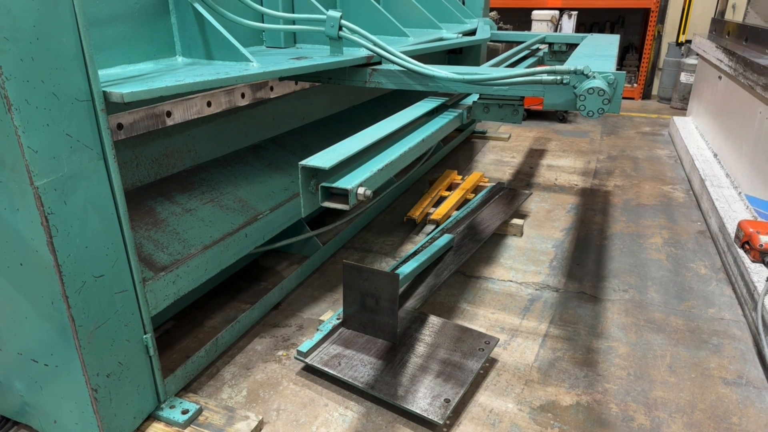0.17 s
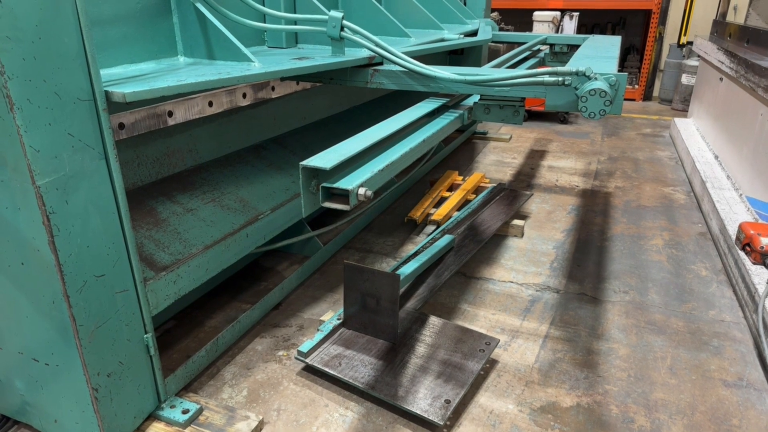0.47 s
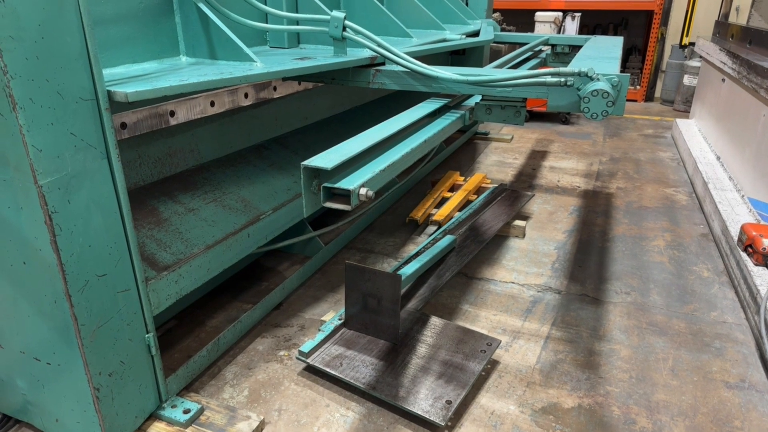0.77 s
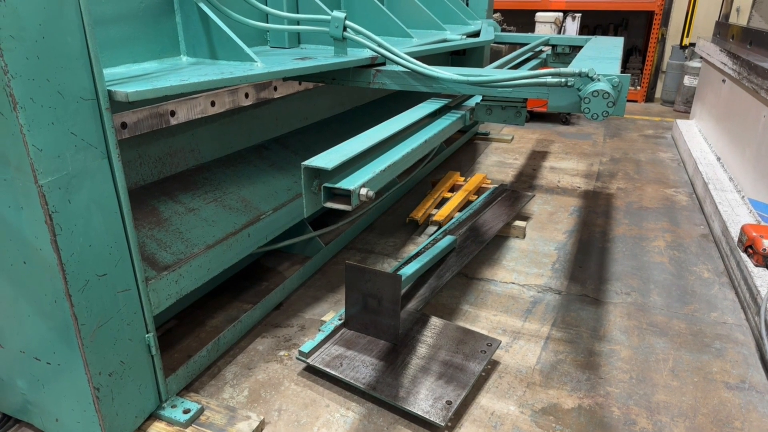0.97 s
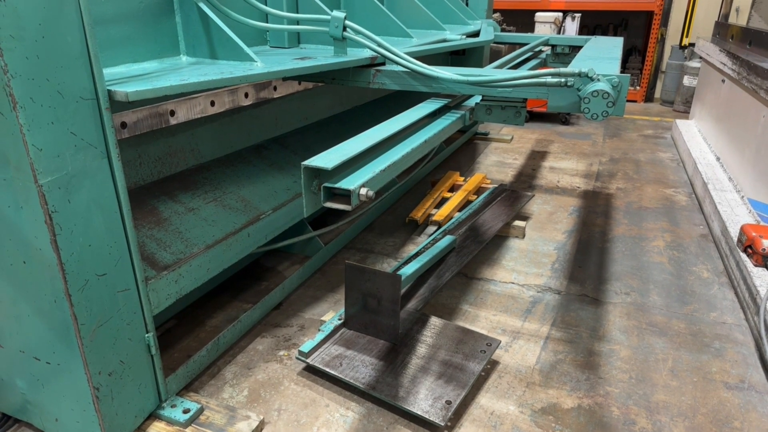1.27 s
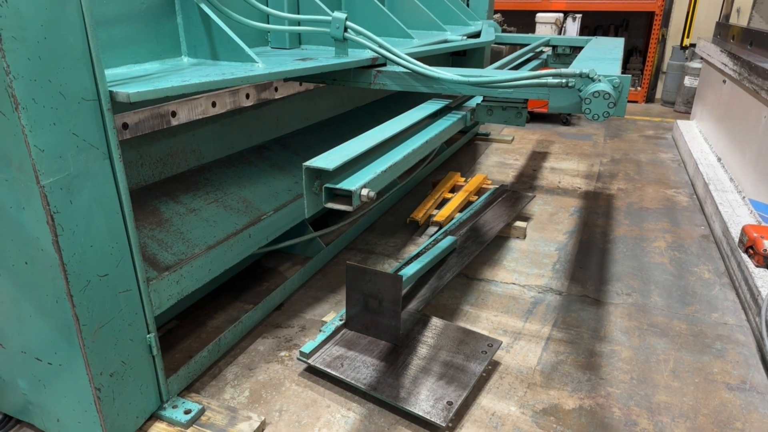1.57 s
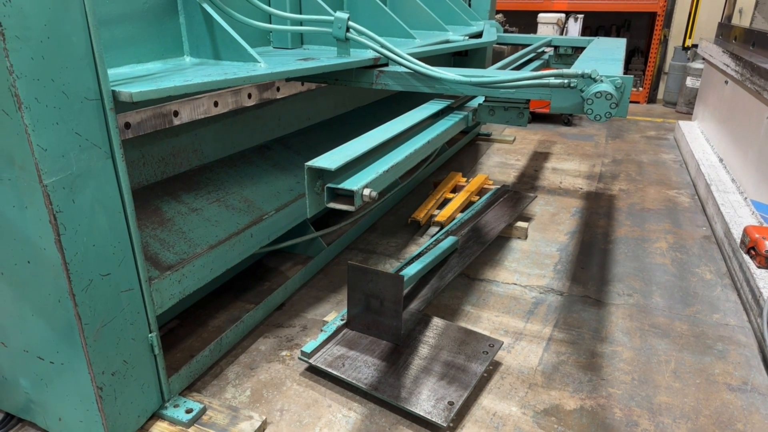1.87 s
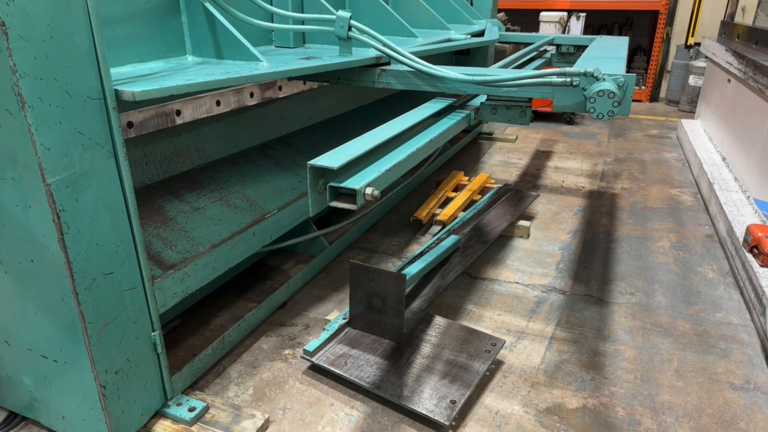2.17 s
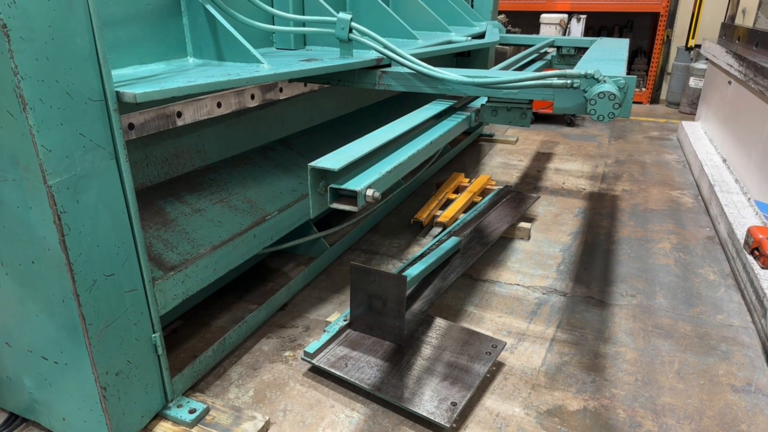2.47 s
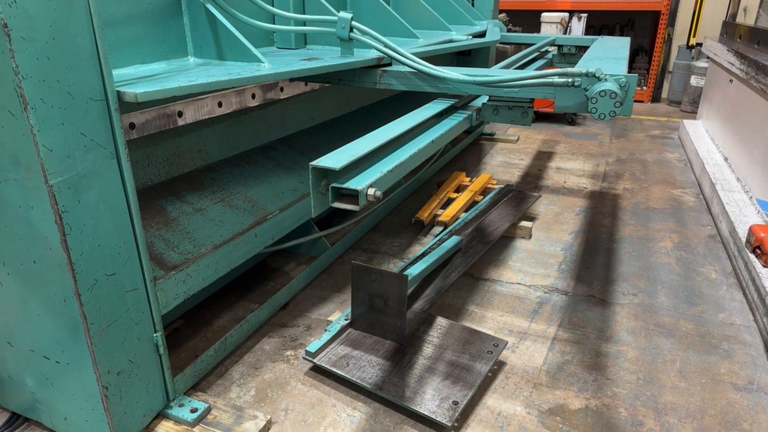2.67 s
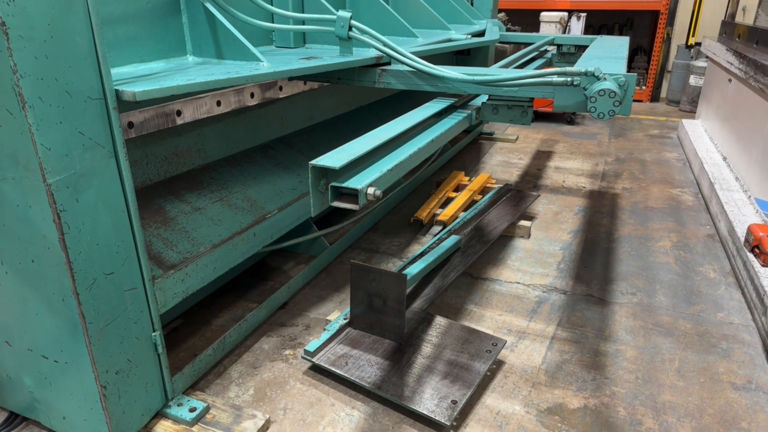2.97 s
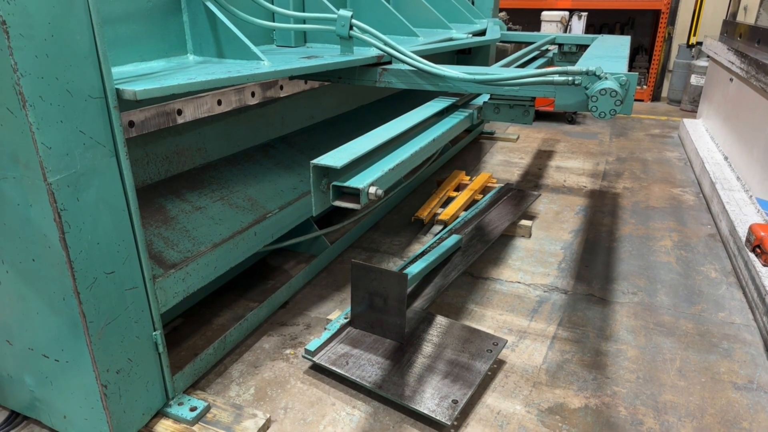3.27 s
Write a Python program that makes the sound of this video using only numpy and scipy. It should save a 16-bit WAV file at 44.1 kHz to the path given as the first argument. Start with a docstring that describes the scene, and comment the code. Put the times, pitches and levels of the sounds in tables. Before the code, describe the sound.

A large hydraulic metal shear hums, whines and hisses, with two hard clunks between strokes.

```python
"""Hydraulic metal shear

A large hydraulic shear works in a workshop, heard close by, the same in both channels.
Motor hum and pump whine are sums of wavering sines over a steady wash of filtered noise.
During each stroke oil rushes as broad noise and sings in narrow, fluttering noise bands.
A valve shuts with a clunk of decaying noise and frame tones; the pump idles slightly faster.
A second clunk starts the next stroke, in which a valve whistles briefly.
"""
import sys
import numpy as np
from scipy import signal
from scipy.fft import rfft, irfft, next_fast_len
from scipy.io import wavfile

SR = 44100
rng = np.random.default_rng(int(sys.argv[2]) if len(sys.argv) > 2 else 0)


def persist_wave(psi):
    """Save psi, clipped to +-1, as 16-bit WAV."""
    counts = np.round(np.clip(psi, -1, 1) * 32767).astype(np.int16)
    wavfile.write(sys.argv[1], SR, np.atleast_2d(counts).T)


N = 150822  # length in samples


def amp(db):
    """Decibels to gain."""
    return 10 ** (np.asarray(db) / 20)


def unit(x):
    """Scales to rms 1."""
    return x / np.sqrt(np.mean(x ** 2) + 1e-20)


def read(points, hz):
    """Reads a table on a log-frequency axis."""
    f, value = np.transpose(points)
    return np.interp(np.log(hz + 1), np.log(f + 1), value)


def add(mix, s, sound):
    """Adds a sound at its time."""
    part = mix[round(s * SR):][:len(sound)]
    part += sound[:len(part)]


def noise(shape, size=N):
    """Noise of rms 1 with the gain shape(Hz)."""
    n = next_fast_len(size)
    spectrum = rfft(rng.standard_normal(n)) * shape(np.fft.rfftfreq(n, 1 / SR))
    return unit(irfft(spectrum, n)[:size])


def drift(hz):
    """Slow random wavering of rms 1, up to about hz, drawn every 64 samples."""
    frames = N // 64 + 2
    f = np.fft.rfftfreq(frames, 64 / SR)
    lowpass = (f > 0) / (1 + (f / hz) ** 2)
    slow = unit(irfft(rfft(rng.standard_normal(frames)) * lowpass, frames))
    return np.interp(np.arange(N) / 64, np.arange(frames), slow)


def ramp(s, length):
    """Goes from 0 to 1, starting at s."""
    return np.clip((np.arange(N) / SR - s) / length, 0, 1)


# motor hum lines [f/Hz]
HUM_HZ = [60, 90.2, 120.05, 150.6, 180, 210.1, 240, 269.3, 299.5]
# strength of each hum line and how much it wavers [level/dB, waver/dB]
HUM_LEVELS = [(-61, 2), (-51, 1.6), (-30, 0.3), (-47, 0.67), (-57.5, 2.5), (-42.5, 1.3), (-54.5, 2.6),
              (-50.5, 4.1), (-51.5, 1.8)]
HUM_LOAD_DB = 1.3  # the hum is this much louder under load


def hum(load):
    """The motor's magnetic hum and the low throb of its casing: wavering sines."""
    t = np.arange(N) / SR
    lines = np.zeros(N)
    for hz, (db, waver) in zip(HUM_HZ, HUM_LEVELS):
        level = amp(db + waver * drift(hz=6.8))
        lines += level * np.sin(2 * np.pi * (hz * t + rng.random()))
    return lines * amp(HUM_LOAD_DB * (load - 1.0))


# pump harmonics 1, 2, 3 .. under load and idling [level/dB]
PUMP_LOADED = [-47, -37, -48.5, -42, -57, -51.5, -57, -51, -62, -62, -57, -53, -59, -59, -55, -61, -57]
PUMP_IDLE = [-50, -44, -39.5, -50, -50, -58, -50, -54.5, -64, -72, -57, -54, -61, -62, -74, -62, -63, -77,
             -59, -66, -69, -68, -64, -57.5, -67, -61, -55.5, -60, -63, -74, -63, -68, -71, -73, -77, -75,
             -73, -75, -73, -65, -75, -68]
# sidebands that unequal pump strokes bring out [multiple of the shaft speed]
SIDE_ORDERS = [14, 20, 26, 28, 30, 31, 32, 33, 34, 35, 37, 38, 45, 49, 50, 61]
# sidebands under load and idling [level/dB]
SIDE_LOADED = [-56, -56, -54.5, -51.5, -56, -47, -42.5, -52, -49, -41.5, -51, -50, -54, -54, -54, -66]
SIDE_IDLE = [-56, -57, -66, -63, -61, -48, -45, -58, -47.5, -51, -46, -58, -61, -58, -59, -57]
# swelling and fading of the pump's fundamental, on top of its level [t/s, level/dB]
PUMP_SWELL = [(0, -1.5), (.35, 1.5), (.9, 4.5), (1.25, -13), (1.42, 7), (1.65, -15), (1.93, 8), (2.2, -15),
              (2.5, -0.5), (2.9, 2), (3.4, -1.5)]
SHAFT_LOADED_HZ, SHAFT_IDLE_HZ, PULSES_PER_TURN = 29.70, 29.843, 12
SPEED_WANDER = 0.00043  # rms share of the shaft speed
WAVER_LOADED, WAVER_IDLE, WAVER_STRONG = 0.38, 0.13, 0.13  # rms share of a line's level


def pump(load):
    """Harmonics of the pumping rate with shaft sidebands; load slows and unsteadies them."""
    speed = SHAFT_IDLE_HZ + (SHAFT_LOADED_HZ - SHAFT_IDLE_HZ) * load
    turns = np.cumsum(speed * (1 + SPEED_WANDER * drift(hz=8.9))) / SR
    swell_db = np.interp(np.arange(N) / SR, *np.transpose(PUMP_SWELL))
    states = [(load, WAVER_LOADED, PUMP_LOADED, SIDE_LOADED),
              (1 - load, WAVER_IDLE, PUMP_IDLE, SIDE_IDLE)]
    out = np.zeros(N)
    for share, waver, main, sides in states:
        orders = [PULSES_PER_TURN * (k + 1) for k in range(len(main))] + SIDE_ORDERS
        for k, db in zip(orders, main + sides):
            level = amp(db + swell_db if k == PULSES_PER_TURN else db)
            # under load the strongest harmonic holds steadier than the rest
            depth = WAVER_STRONG if db == max(main) else waver
            tone = np.sin(2 * np.pi * (k * turns + rng.random()))
            out += share * level * (1 + depth * drift(hz=4.1)) * tone
    return out


ECHO_DB, ECHO_T60_S = -7, .16  # level against the direct sound, decay time


def reflected(x):
    """Reflections from the steel around the valves comb the hiss, at about the same total power."""
    t = np.arange(SR // 10) / SR
    cloud = rng.standard_normal(len(t)) * amp(-60 * t / ECHO_T60_S)
    highpass = signal.butter(2, 1500, "highpass", fs=SR, output="sos")
    cloud = signal.sosfilt(highpass, cloud)
    echo = signal.fftconvolve(x, cloud / np.linalg.norm(cloud))[:N]
    return (x + amp(ECHO_DB) * echo) / np.hypot(1, amp(ECHO_DB))


# colour of the fan and pump wash [f/Hz, relative level per Hz/dB]
WASH_COLOUR = [(25, -43), (45, -22), (85, -8), (120, -7.5), (190, -6), (280, -13.5), (350, -18.5),
               (520, -15), (700, -15), (1050, -20.5), (1250, -16), (1500, -18), (2100, -17.5), (3100, -27),
               (4200, -23.5), (5000, -24.5), (6400, -28.5), (7700, -31), (9500, -23.5), (11500, -34),
               (13000, -36), (15500, -36)]
WASH_DB = -39.5


def wash():
    """Steady wash of fan and pump: coloured noise with reflections."""
    return amp(WASH_DB) * reflected(noise(lambda f: amp(read(WASH_COLOUR, f))))


# colour of the oil rush in the first and the second stroke [f/Hz, relative level per Hz/dB]
FLOW_FIRST = [(60, -30), (150, -1), (300, -0.5), (600, 2), (780, -2), (1050, 0), (1400, 0), (1800, -11.5),
              (2700, -7.5), (4000, -10), (4900, -8.5), (6200, -14.5), (8000, -5), (8700, -12), (10200, -10),
              (11800, -18.5), (14500, -15), (15800, -16.5)]
FLOW_SECOND = [(60, -31), (150, 3), (300, -1), (600, 6), (780, 0.5), (1100, 2.5), (1400, 1), (1750, -5),
               (2250, -8), (2700, -6), (4300, -6), (5300, -11), (6100, -8), (8000, -6), (10200, -8),
               (11800, -15.5), (14500, -11), (15800, -16)]
# valve resonances in each stroke [f/Hz, width/Hz, level/dB]; half gain 0.55 widths either side
SING_FIRST = [(2470, 100, -43), (2840, 57, -45), (3284, 150, -39.5), (3630, 200, -43.5), (4380, 120, -45.5),
              (5240, 78, -42), (7250, 180, -41), (7580, 250, -44.5)]
SING_SECOND = [(1470, 110, -37), (3110, 93, -37), (3240, 140, -36.5), (3446, 200, -39.5), (4460, 130, -45),
               (6596, 87, -36.5), (7010, 71, -39.5), (7230, 230, -38), (7305, 72, -33.5),
               (7560, 150, -41.5)]
FLOW_DB = -30.5  # both strokes


def stroke(flow, resonances, flowing, singing, flutter_db):
    """Turbulent oil: a broad rush and narrow valve resonances that flutter."""
    rush = amp(FLOW_DB + 0.77 * drift(hz=60)) * noise(lambda f: amp(read(flow, f)))
    sing = np.zeros(N)
    for hz, width, db in resonances:
        sing += amp(db) * noise(lambda f: 1 / (1 + ((f - hz) / (0.55 * width)) ** 2))
    # a slower waver and a rough, fast one
    flutter = unit(amp(flutter_db * (0.52 * drift(hz=35) + drift(hz=400))))
    return reflected(flowing * rush) + singing * flutter * sing


# spurts of oil as the valve spool shifts [t/s, hold length/s, level/dB, treble tilt/dB per octave]
SPURTS = [(0.755, 0.015, -22, 8), (2.3004, 0.027, -25, 3)]
# colour of a spurt before tilting [f/Hz, relative level per Hz/dB]
SPURT_COLOUR = [(500, -17), (2800, -13), (4000, -1.5), (6000, -1), (9000, -2), (10500, -3), (11700, -14),
                (15500, -12)]


def spurt(length, db, tilt_db):
    """A short bright jet through the shifting valve: a burst of coloured noise."""
    t = np.arange(SR // 10) / SR
    fade = np.exp(-np.maximum(t - length, 0) / 0.0062)
    envelope = np.minimum(t / 0.00087, 1) * fade

    def colour(f):
        return amp(read(SPURT_COLOUR, f) + tilt_db * np.log2(f / 1000 + 1))

    return amp(db) * envelope * noise(colour, size=len(t))


# blows of the pressure shock on pipes and frame [t/s, level/dB, tilt/dB per octave above 400 Hz]
BLOWS = [(.757, -27, -2.5), (.7615, -17.5, 1), (.775, -19.5, -2.1), (.789, -19.5, -4), (.857, -27.5, -8),
         (2.312, -21, -2), (2.317, -20.5, -4), (2.340, -23.5, -2.5)]
# colour of a blow before tilting [f/Hz, relative level per Hz/dB]
CLUNK_COLOUR = [(40, -40), (90, -6), (160, -1.5), (350, -2.5), (650, 1), (1200, 2.5), (2200, -1.5),
                (2900, -0.5), (4000, -5), (6200, -10), (7600, -2), (9200, -18), (10400, -8), (12000, -25),
                (13600, -12), (14600, -22), (15700, -46)]
# decay of the blow itself and of the workshop's tail [f/Hz, t60/s]
CLUNK_T60 = [(100, 1), (400, 0.19), (1000, 0.34), (2500, 0.27), (5000, 0.28), (9000, 0.11), (15000, 0.14)]
ROOM_T60 = [(100, 1.9), (1000, 1.56), (4000, 0.92), (14000, 0.29)]
# ringing of the frame, relative to the blow [f/Hz, level before a common 2 dB lift/dB, t60/s]
FRAME = [(87.3, -25, 1.4), (153.6, -17, 1.6), (290, -22, 0.58), (487, -20, 1.2), (628, -10.5, 0.72),
         (819, -15, 0.38), (950, -16, 0.39), (1183, -9, 0.36), (1400, -28, .4), (1500, -24, 0.52),
         (1703, -22, 0.32)]
ROOM_DB = -9.5  # starting level of the tail against the blow
BLOW_RISE_S, BASS_RISE_S = 0.00069, .012


def blow(db, tilt_db):
    """A dense steel crash: treble first, bass later, ringing frame and the workshop's tail."""
    t = np.arange(SR) / SR

    def colour(f):
        return amp(read(CLUNK_COLOUR, f) + tilt_db * np.log2(np.maximum(f, 400) / 1000))

    hz, at, bands = signal.stft(noise(colour, size=SR), SR, nperseg=256)
    hz = hz[:, None]
    direct = amp(-60 * at / read(CLUNK_T60, hz))
    room = amp(ROOM_DB) * amp(-60 * at / read(ROOM_T60, hz))
    rise_s = BASS_RISE_S / (1 + (hz / 500) ** 2)  # treble builds up sooner
    swell = 1 - np.exp(-(at + 0.003) / rise_s)
    crash = signal.istft(bands * swell * np.hypot(direct, room), SR, nperseg=256)[1][:SR]
    ring = np.zeros(SR)
    for f, level, t60 in FRAME:
        ring += amp(level - 60 * t / t60) * np.sin(2 * np.pi * (f * t + rng.random()))
    ring *= amp(2.0) * np.minimum(t / BASS_RISE_S, 1)
    return amp(db) * np.minimum(t / BLOW_RISE_S, 1) * (crash + ring)


# oil squeezed past the valve seat [t/s, level/dB, t60/s]
SQUEALS = [(.771, -24.5, .19), (2.314, -30, .09)]
SQUEAL_HZ, SQUEAL_HALF_WIDTH_HZ = 14700, 500  # half gain this far either side


def squeal(db, t60):
    """Oil squeezed past the valve seat: a narrow, very high hiss that dies quickly."""
    t = np.arange(SR // 2) / SR
    envelope = np.minimum(t / .002, 1) * amp(db - 60 * t / t60)

    def band(f):
        return 1 / (1 + ((f - SQUEAL_HZ) / SQUEAL_HALF_WIDTH_HZ) ** 4)

    return envelope * noise(band, size=len(t))


# the heavy body shudders after each clunk [t/s, level/dB, t60/s]
SHUDDERS = [(.785, -34.5, 2.1), (2.33, -38, 2.2)]
# colour of the shudder [f/Hz, relative level per Hz/dB]
SHUDDER_COLOUR = [(40, -35), (70, -12), (90, 0), (150, -2), (200, 2), (280, -1.5), (500, -15), (1000, -39)]


def shudder(db, t60):
    """Low rumble of the machine's body dying away: decaying bass noise."""
    t = np.arange(2 * SR) / SR
    envelope = amp(db - 60 * t / t60) * np.minimum(t / BASS_RISE_S, 1)
    return envelope * noise(lambda f: amp(read(SHUDDER_COLOUR, f)), size=len(t))


# a valve whistles briefly [t/s, length/s, f/Hz, level/dB]
WHISTLE = (3, 0.4, 4447, -37)
WHISTLE_WANDER_HZ = 22


def whistle(length, hz, db):
    """A narrow, unsteady valve tone that swells and fades: a sine of wandering pitch."""
    size = round(length * SR)
    turns = np.cumsum(hz + WHISTLE_WANDER_HZ * drift(hz=80.1)[:size]) / SR
    swell = np.sin(np.linspace(0, np.pi, size))
    return np.sqrt(2) * amp(db) * swell * np.sin(2 * np.pi * turns)


STOP_S, START_S, LOAD_LAG_S = .775, 2.315, .05  # load drops, load returns, time each takes
SING_DELAY_S, SING_RISE_S, SING_SETTLE_DB = 0.02, 0.055, -2.5  # second stroke


def scene():
    """Stroke, clunk, idling, clunk, stroke."""
    first = 1 - ramp(STOP_S, LOAD_LAG_S)
    second = ramp(START_S, LOAD_LAG_S)
    load = first + second
    settle = amp(SING_SETTLE_DB * ramp(START_S, 1))
    singing = ramp(START_S + SING_DELAY_S, SING_RISE_S) * settle
    # sine levels are rms, hence the root of two
    mix = np.sqrt(2) * (hum(load) + pump(load)) + wash()
    mix += stroke(FLOW_FIRST, SING_FIRST, first, first, flutter_db=1.1)
    mix += stroke(FLOW_SECOND, SING_SECOND, second, singing, flutter_db=1)
    for table, source in [(SPURTS, spurt), (BLOWS, blow), (SQUEALS, squeal), (SHUDDERS, shudder)]:
        for s, *row in table:
            add(mix, s, source(*row))
    add(mix, WHISTLE[0], whistle(*WHISTLE[1:]))
    return np.array([mix, mix])


EDGE_HZ = 15850  # upper band limit


def record(dry):
    """The microphone's bass roll-off and the band limit."""
    highpass = signal.butter(2, 45, "highpass", fs=SR, output="sos")
    thin = signal.sosfilt(highpass, dry)
    lowpass = signal.firwin(801, EDGE_HZ, window=("kaiser", 9), fs=SR)
    return signal.oaconvolve(thin, lowpass[None], "same")


dry = scene()
out = record(dry)
persist_wave(out)
```